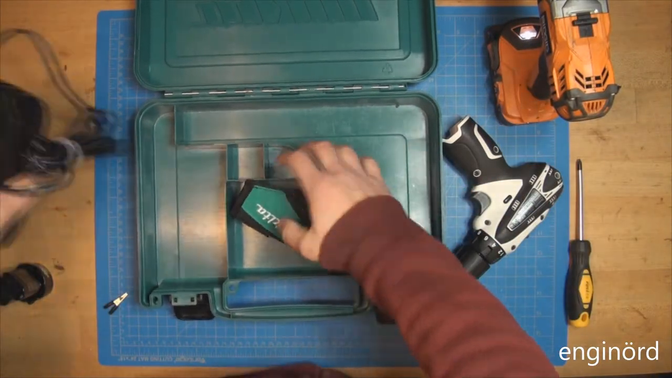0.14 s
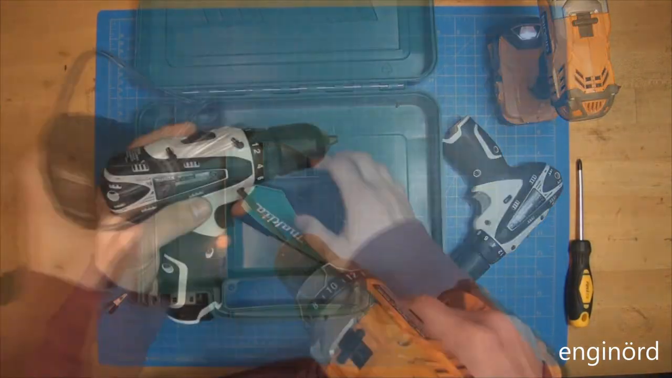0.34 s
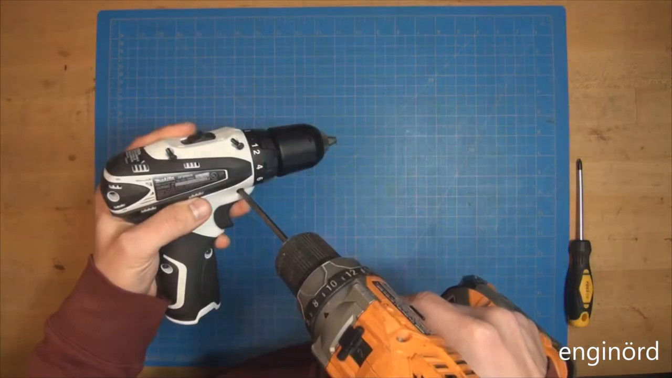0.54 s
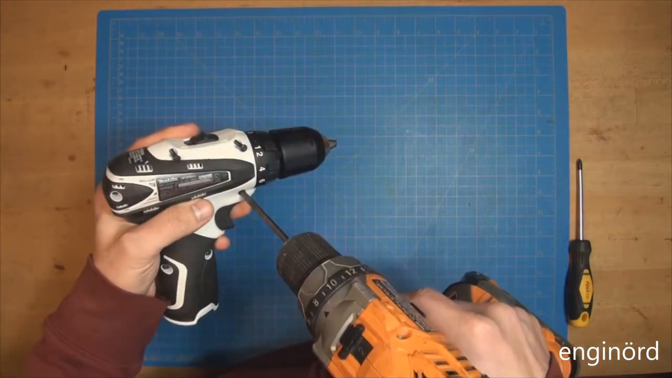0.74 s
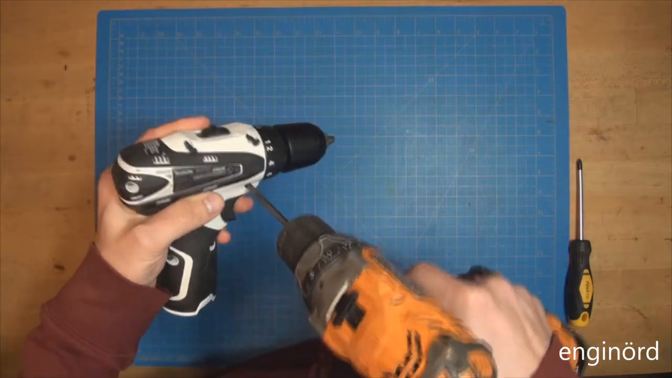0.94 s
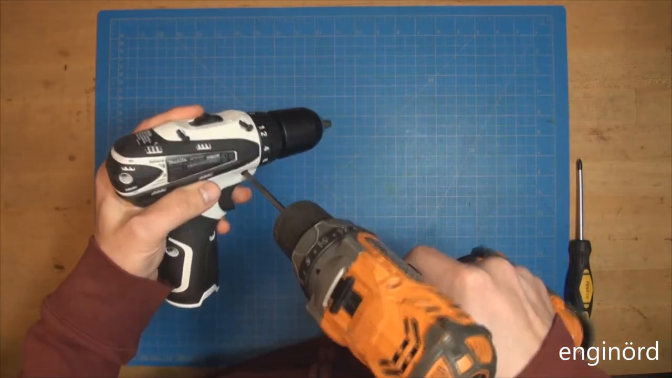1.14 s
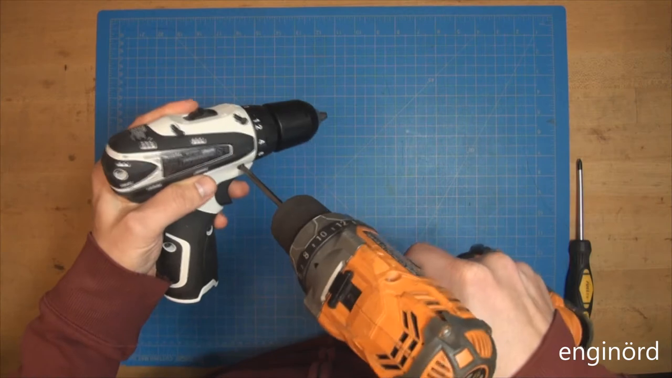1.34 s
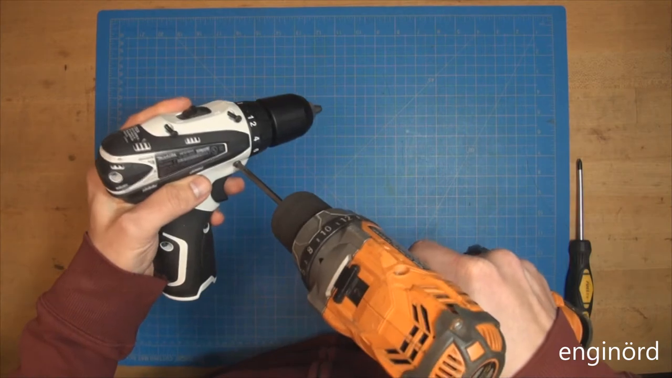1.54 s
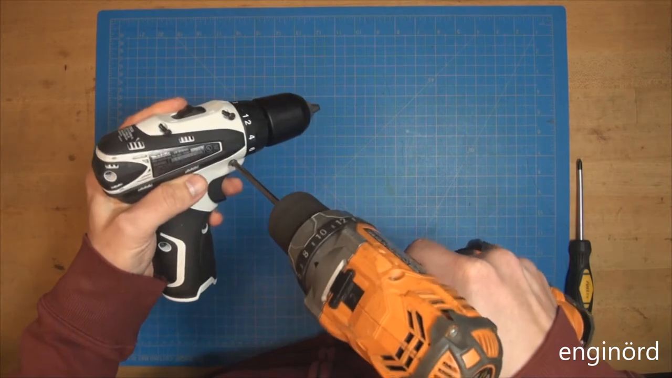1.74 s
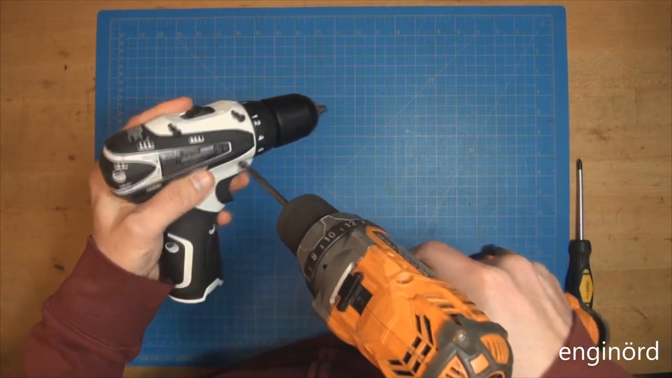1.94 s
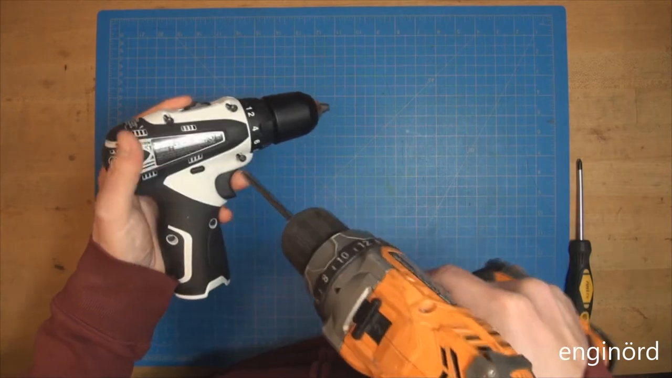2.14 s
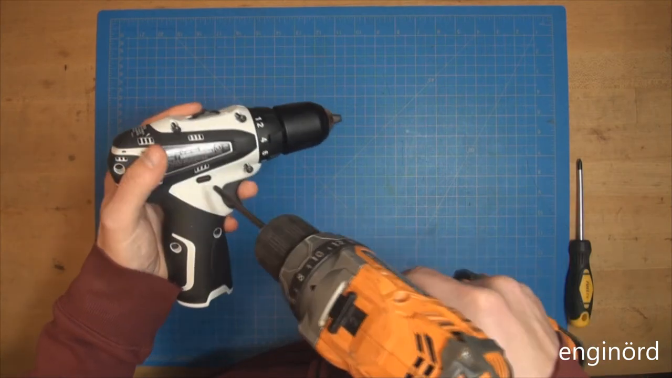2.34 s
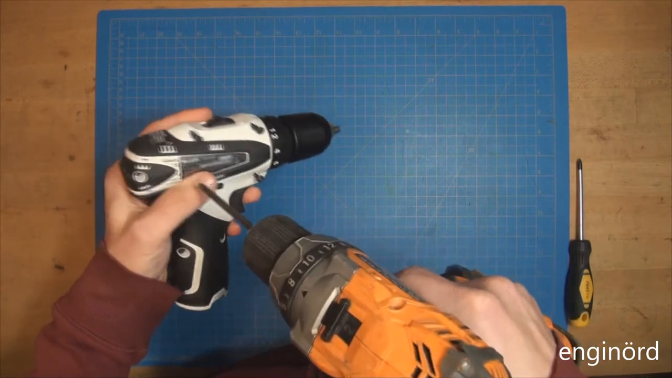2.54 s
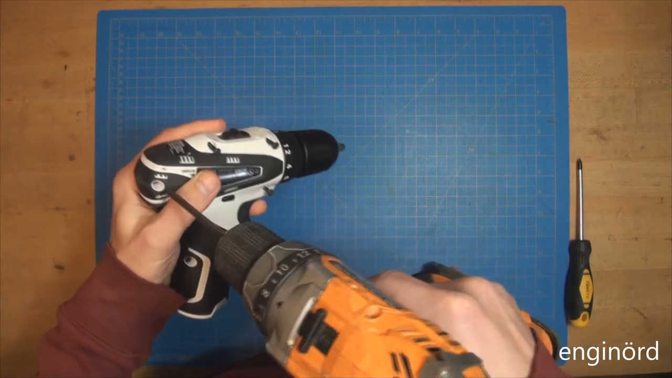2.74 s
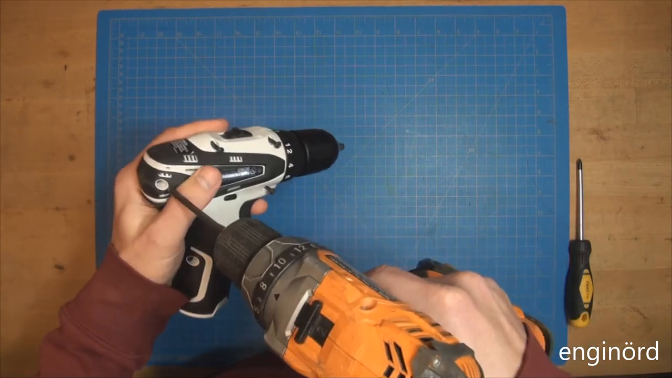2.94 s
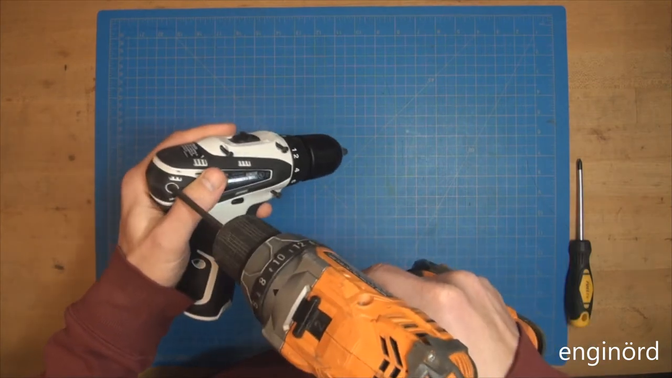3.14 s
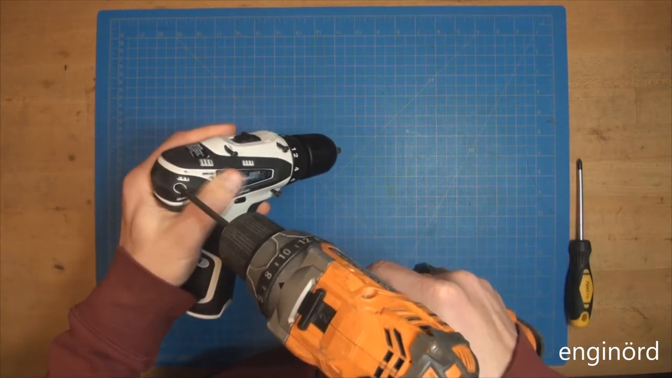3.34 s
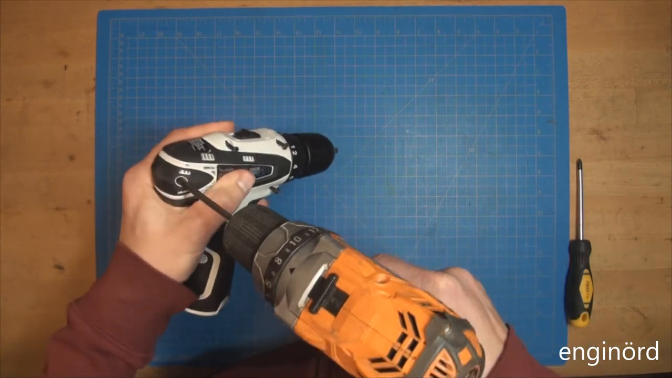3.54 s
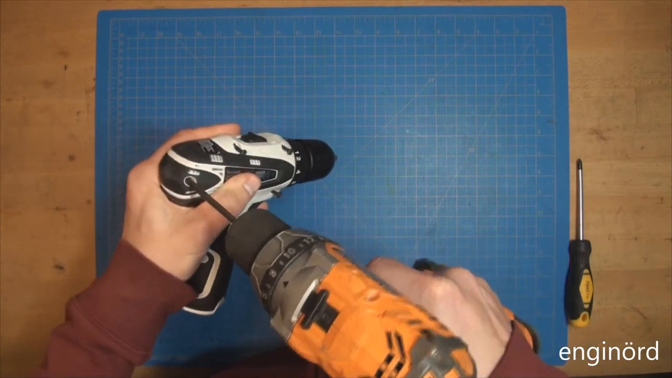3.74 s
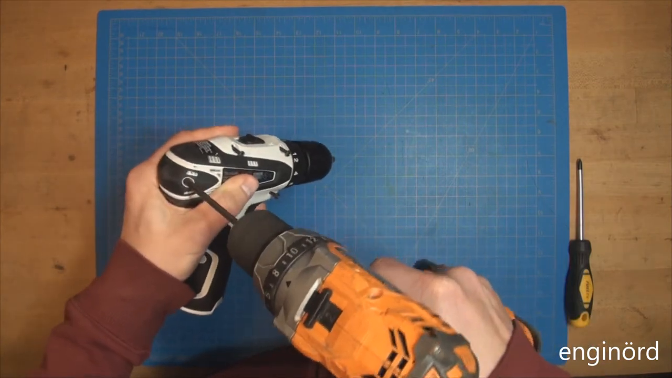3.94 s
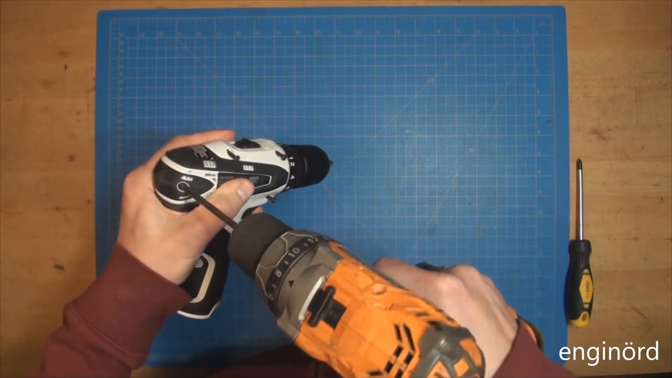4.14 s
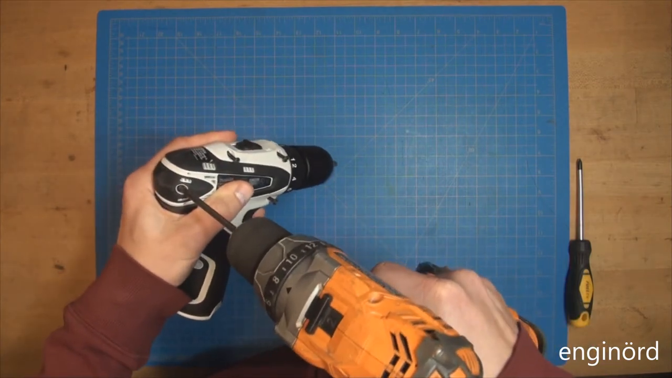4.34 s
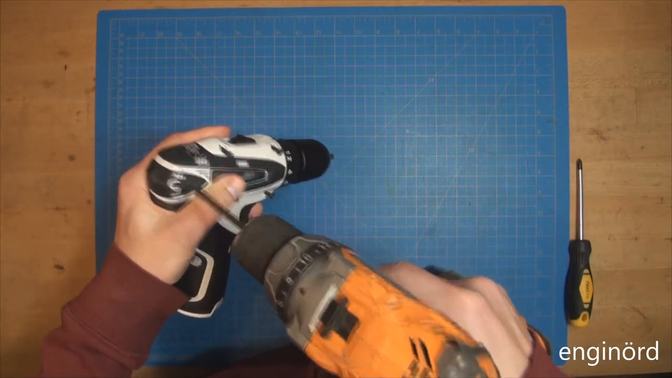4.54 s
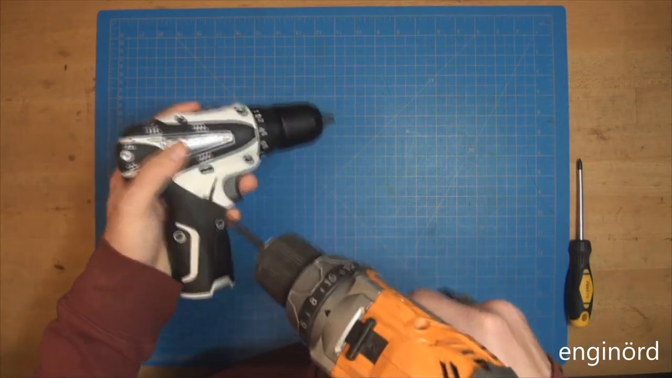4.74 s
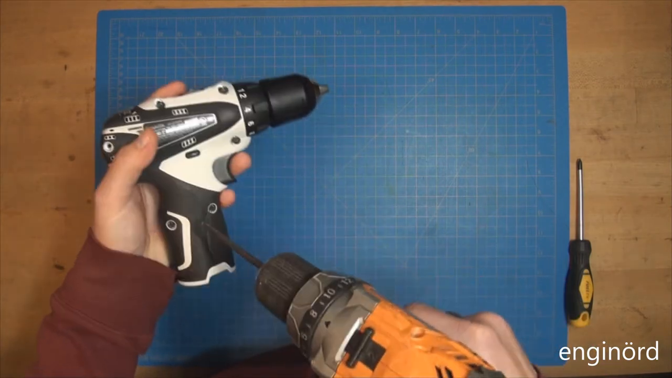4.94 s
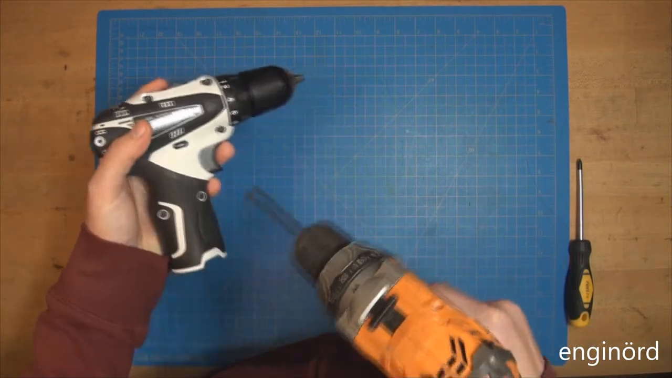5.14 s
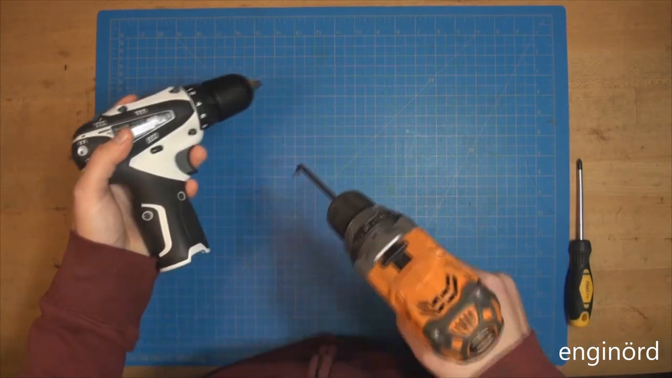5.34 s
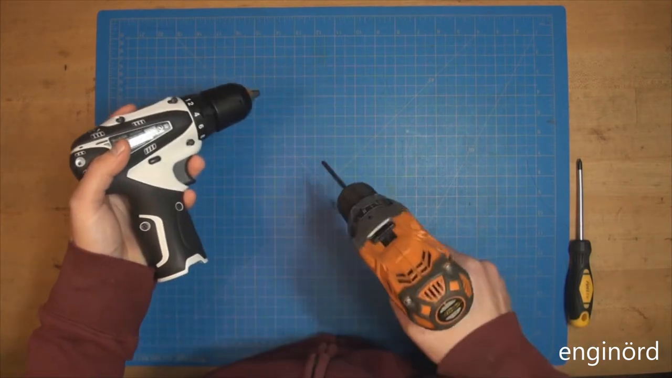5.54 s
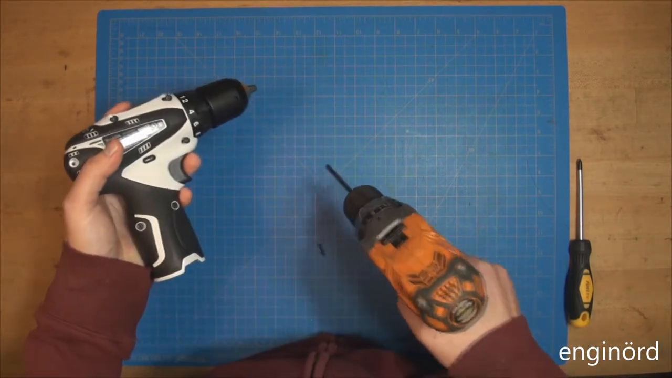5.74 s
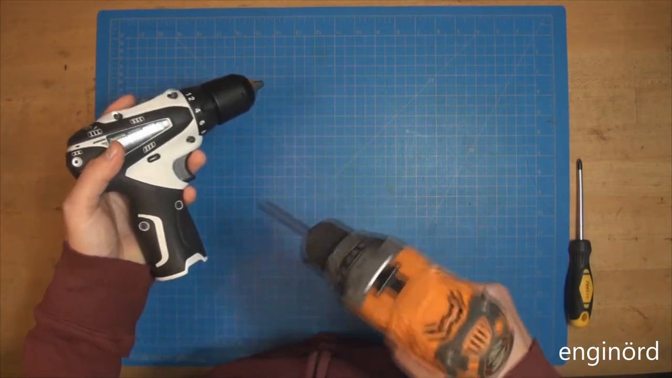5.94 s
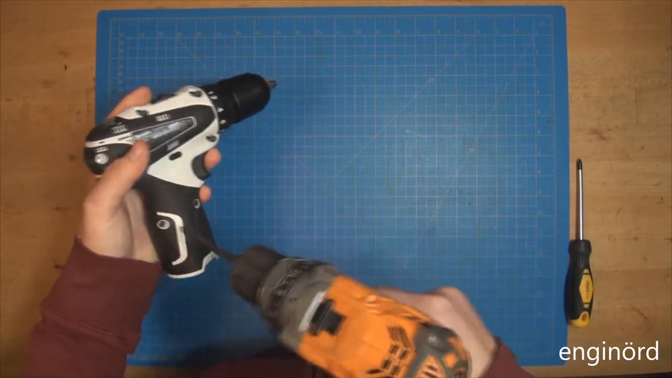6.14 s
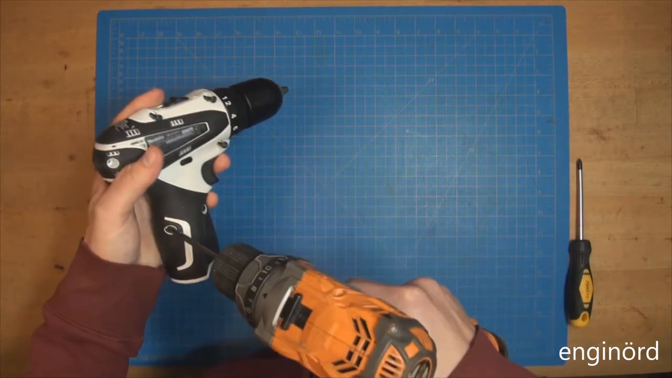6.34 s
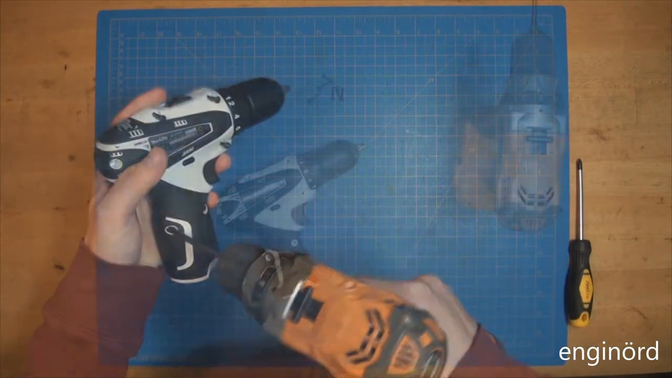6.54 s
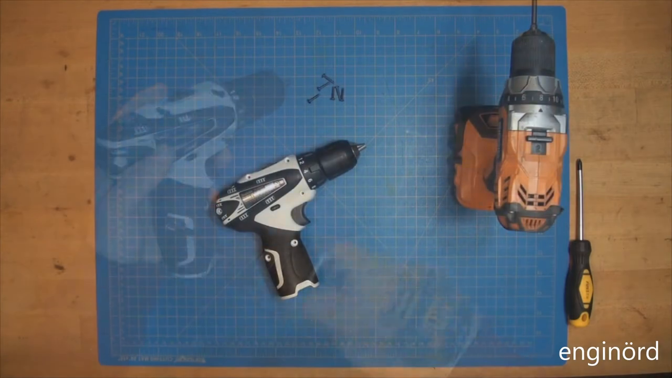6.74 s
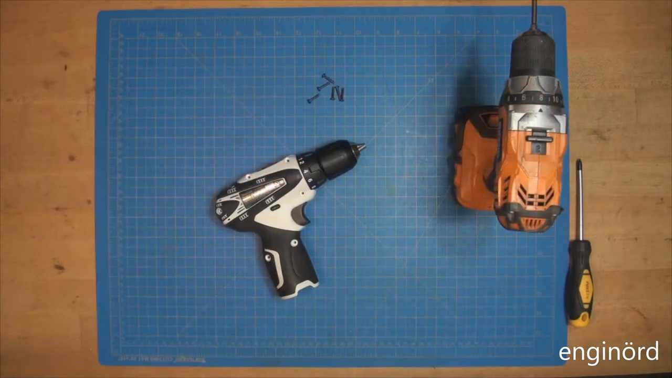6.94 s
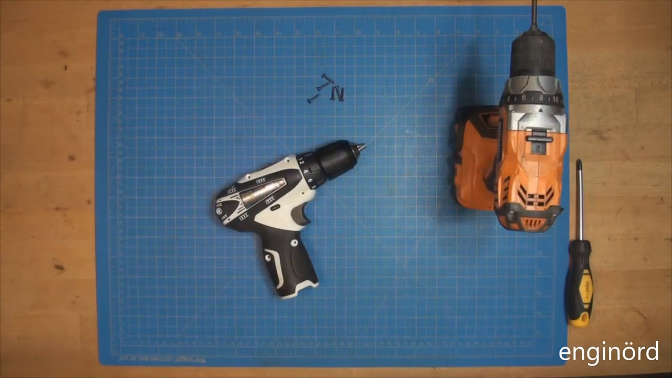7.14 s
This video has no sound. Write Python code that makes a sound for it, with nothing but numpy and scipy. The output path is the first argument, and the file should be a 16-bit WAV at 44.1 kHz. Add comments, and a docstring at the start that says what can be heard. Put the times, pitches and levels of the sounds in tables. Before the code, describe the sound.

Plastic case clatter, bit clicks and two brief cordless drill whirrs with cracking screw threads, then a small screw ticks down and rolls away.

```python
"""Small workshop room, mono but for the hiss: a cordless drill-driver backs two screws out of a plastic housing.
A plastic tool case is knocked shut first (shell modes, cracks, boom). The bit clicks into each screw head;
the thread cracks and rubs (noise grains) while the gearbox whirrs up and coasts down (scrape and mesh tones).
A screw clinks on the bit, drops, bounces and rolls on the mat; cloth and skin rub over the bench (noise)."""
import sys
import numpy as np
from scipy import signal
from scipy.fft import rfft, irfft
from scipy.io import wavfile
from scipy.ndimage import map_coordinates

SR = 44100
rng = np.random.default_rng(int(sys.argv[2]) if len(sys.argv) > 2 else 0)


def to_wav(s):
    """Save 16-bit WAV."""
    ch = np.atleast_2d(s).T  # columns
    pcm = np.round(np.clip(ch, -1, 1) * 32767)  # PCM
    wavfile.write(sys.argv[1], SR, pcm.astype(np.int16))


N = 317901
T = np.arange(N) / SR
AGE = T[:SR // 2]  # s since a blow

# trigger pulls [start/s, screw free/s, trigger eased/s, brake bites/s, gear level/dB, thread rub/dB,
#  whine onset/s, first catch/s, first catch peak/dB, loss per further catch/dB]
TRIGGER_PULLS = [(1.313, 1.95, 2.075, 2.105, -22.5, -35.5, 1.486, 1.476, -8, 0.5),
                 (3.91, 4.42, 4.585, 4.635, -21, -29.5, 3.95, 4.092, -9.5, 8)]
# gearbox shell resonances [f/Hz, width/Hz, gain in pull 1/dB, gain in pull 2/dB]
SHELL_RESONANCES = [(662, 48, 0, 7.5), (3770, 300, -2, -3.5), (4260, 170, -20, -5.5), (5650, 510, -8, 4),
                    (7430, 1200, -3, 2), (12200, 1900, -11, -33)]
# colour of steel thread in plastic [f/Hz, level/dB]
THREAD_SPECTRUM = [(100, -27.5), (650, -1), (1100, -2.5), (2000, 3), (4000, 4.5), (7000, -13.5),
                   (15000, -37)]
FREE_TOOTH_HZ = 1505  # tooth mesh rate, unloaded


def undb(db):
    """Decibels to gain."""
    return 10 ** (np.asarray(db) / 20)


def unit(x):
    """Scale to rms 1."""
    return x / np.sqrt(np.mean(x ** 2))


def walk(rate_hz):
    """Smooth random drift, rms 1, with rate_hz new values a second."""
    return unit(np.interp(T * rate_hz, np.arange(N // 20), rng.standard_normal(N // 20)))


def colour(x, points):
    """Minimum-phase filter through [f/Hz, level/dB] points, via the folded cepstrum."""
    hz, db = np.transpose(points)
    size = 2 ** 12
    bin_hz = np.arange(size // 2 + 1) * SR / size
    gain = undb(np.interp(np.log(bin_hz + 1), np.log(hz), db))
    cepstrum = irfft(np.log(gain))
    cepstrum[1:size // 2] *= 2
    cepstrum[size // 2 + 1:] = 0
    impulse = irfft(np.exp(rfft(cepstrum)))
    return signal.fftconvolve(x, impulse)[:len(x)]


def cut(x, hz, kind, order=2):
    """Butterworth low, high or band-pass."""
    return signal.sosfilt(signal.butter(order, hz, kind, fs=SR, output="sos"), x)


def fade(t60_s):
    """Exponential decay, 60 dB in t60_s."""
    return np.exp(-np.log(1000) * AGE / t60_s)


def ring(modes, scatter_db, detune):
    """Decaying modes; each blow lands elsewhere and weights them anew."""
    out = np.zeros(len(AGE))
    for hz, db, t60_s in modes:
        level, pitch, phase = rng.standard_normal(3)
        tone = np.sin(2 * np.pi * hz * (1 + detune * pitch) * AGE + np.pi * phase)
        out += undb(db + scatter_db * level) * fade(t60_s) * tone
    return out


def contact(scatter, t60_s):
    """Unit click, then dense decaying reflections."""
    return (AGE == 0) + scatter * fade(t60_s) * rng.standard_normal(len(AGE))


def add(out, start_s, sound):
    """Mix a sound in at start_s."""
    i = max(int(start_s * SR), 0)
    out[i:i + len(sound)] += sound[:N - i]


def grains(spread_db):
    """Dense micro-contacts of unequal size, up to a largest one."""
    size = np.minimum(rng.exponential(size=N), 4.5)
    return unit(rng.standard_normal(N) * undb(spread_db * size))


def resonance(hz, centre_hz, width_hz):
    """Gain of a tone as it glides through a resonance."""
    return 1 / (1 + (2 * (hz - centre_hz) / width_hz) ** 2)


def swell(start_s, length_s, attack_s, t60_s):
    """Envelope of a rub: linear rise from start_s, decay from start_s + length_s."""
    rise = np.clip((T - start_s) / attack_s, 0, 1)
    return rise * undb(-60 * np.clip((T - start_s - length_s) / t60_s, 0, 10))


def swells(rows, attack_s, t60_s):
    """Joint envelope of several rubs; their powers add."""
    return np.sqrt(sum((undb(db) * swell(s, length_s, attack_s, t60_s)) ** 2 for s, length_s, db in rows))


def tightness(pull):
    """Grip of the thread: 1 at the start of a pull, 0 once the screw runs free."""
    start_s, free_s = pull[:2]
    return (T > start_s) * np.clip((free_s - T) / (free_s - start_s), 0, 1)


def tooth_rate(pull, spin_up_lag=.45, spin_up_s=.028, load_sag=.07, coast_hz_per_s=1750):
    """Tooth rate in Hz: spins up, gains as the screw loosens, slows once the trigger is eased; floor at half."""
    start_s, _, eased_s = pull[:3]
    # lag and sag are shares of the free speed
    spin_up = 1 - spin_up_lag * np.exp(-np.maximum(T - start_s, 0) / spin_up_s)
    load = 1 - load_sag * (1 - (1 - tightness(pull)) ** 2)
    hz = FREE_TOOTH_HZ * spin_up * load - coast_hz_per_s * np.maximum(T - eased_s, 0)
    return np.maximum(hz, FREE_TOOTH_HZ / 2)


def gear_gain(pull, tooth_hz, speed_db=16, brake_db_per_s2=950):
    """Gears are louder the faster they turn and die away ever faster under the brake."""
    start_s, _, _, brake_s, db = pull[:5]
    brake_loss_db = brake_db_per_s2 * np.clip(T - brake_s, 0, .5) ** 2
    return (T > start_s) * undb(db + speed_db * (tooth_hz / FREE_TOOTH_HZ - 1) - brake_loss_db)


def shell_gain(tone_hz, j):
    """Lift that the gearbox shell gives a gliding tone in pull j."""
    return 1 + sum(undb(gains_db[j]) * resonance(tone_hz, hz, width_hz)
                   for hz, width_hz, *gains_db in SHELL_RESONANCES)


def gear_noise(tooth_hz, phase, j, ripple=.35, wear_db=-8, wear_samples=293, split_hz=4300, coast_db=24):
    """Teeth scrape once a mesh cycle and ring the shell; slow teeth strike softly, so low growl gains."""
    # gear scrape colour [f/Hz, level/dB]
    gear_colour = [(50, -39), (260, -28), (400, -17.5), (1000, -15), (1500, -8), (2700, -10.5),
                   (5600, -4.5), (9000, -9), (12000, -4.5), (15800, -16)]
    # worn teeth come round again: a pattern of ten teeth is read at the gear speed
    position = np.cumsum(tooth_hz) / FREE_TOOTH_HZ % wear_samples
    wear = map_coordinates(rng.standard_normal(wear_samples), [position], mode="grid-wrap")
    scrape = (grains(1.6) + undb(wear_db) * wear) * (1 + ripple * np.cos(phase)) * undb(.21 * walk(180))
    scrape = colour(signal.fftconvolve(scrape, contact(.047, .0066))[:N], gear_colour)
    shell = scrape.copy()
    for hz, width_hz, *gains_db in SHELL_RESONANCES:
        shell += undb(gains_db[j]) * signal.lfilter(*signal.iirpeak(hz, hz / width_hz, SR), scrape)
    growl = signal.sosfiltfilt(signal.butter(3, split_hz, fs=SR, output="sos"), shell)
    rasp = shell - growl
    growl_gain = undb(coast_db * (1 - tooth_hz / FREE_TOOTH_HZ))
    return (rasp + growl_gain * growl) / np.std(rasp)


def gear_tones(pull, tooth_hz, phase, j, whine_hz=1490, whine_width_hz=450, rise_s=.013, slack_db_per_s2=2600):
    """Meshing sings at multiples of the tooth rate; the whine fades once the teeth no longer drive."""
    # gear and motor tones [multiple of tooth rate, level/dB, wavering 0-1]
    tone_rows = [(.3, -28, .3), (1, -10.2, .15), (3, -18, .17), (4, -22, .4), (5, -23, .35), (8, -23, .4),
                 (9, -23, .4)]
    eased_s, whine_s = pull[2], pull[6]
    slack_loss_db = slack_db_per_s2 * np.clip(T - eased_s, 0, .5) ** 2
    driving = np.clip((T - whine_s) / rise_s, 0, 1) * undb(-slack_loss_db)
    tones = np.zeros(N)
    for k, db, waver in tone_rows:
        if k == 1:
            lift = driving * resonance(tooth_hz, whine_hz, whine_width_hz)
        else:
            lift = shell_gain(k * tooth_hz, j)
        tone = np.cos(k * phase + waver * walk(90)) * (1 + waver * walk(60))
        tones += undb(db) * lift * unit(tone)
    return tones


def gearbox():
    """Scrape noise and mesh tones share one tooth phase, rising and falling with the speed."""
    out = np.zeros(N)
    for j, pull in enumerate(TRIGGER_PULLS):
        # backlash makes the speed tremble
        tooth_hz = tooth_rate(pull) * (1 + .0024 * walk(170))
        phase = 2 * np.pi * np.cumsum(tooth_hz) / SR
        sound = gear_noise(tooth_hz, phase, j) + gear_tones(pull, tooth_hz, phase, j)
        out += gear_gain(pull, tooth_hz) * sound
    return out


def thread(slip_db=1.0):
    """Screw thread sticks and slips in uneven spurts: hard as it gives way, then less as it loosens."""
    # rasps of the yielding thread [start/s, length/s, level/dB]
    breakaway_rows = [(1.32, 0.064, -24.5), (3.903, 0.016, -22)]
    slips = signal.fftconvolve(grains(3.7) * undb(slip_db * walk(140)), contact(.16, .014))[:N]
    rub = sum(undb(pull[5]) * tightness(pull) for pull in TRIGGER_PULLS)
    breakaway = swells(breakaway_rows, attack_s=.0049, t60_s=.028)
    return np.hypot(rub, breakaway) * unit(colour(slips, THREAD_SPECTRUM))


def catches(pull, count=3, teeth_per_turn=107):
    """Tight screw catches once a turn, each time weaker: rows of (t/s, peak/dB)."""
    first_s, db, loss_db = pull[-3:]
    turns = np.cumsum(tooth_rate(pull)) / SR / teeth_per_turn
    times_s = np.interp(np.interp(first_s, T, turns) + np.arange(count), turns, T)
    return [(s, db - k * loss_db) for k, s in enumerate(times_s)]


def cracks():
    """Short, dry snaps of steel thread in plastic."""
    # cracks as the thread gives [t/s, peak/dB]
    crack_rows = [(1.297, -13), (1.419, -10), (3.911, -10), (3.925, -5)]
    out = np.zeros(N)
    for s, db in list(crack_rows) + [row for pull in TRIGGER_PULLS for row in catches(pull)]:
        snap = colour(contact(.22, .024), THREAD_SPECTRUM)
        add(out, s, undb(db) * snap / np.abs(snap).max())
    return out


def seating():
    """Steel bit seats in the screw head: bright click and short ring of the head."""
    # seating clicks [t/s, peak/dB, ring/dB re click]
    seating_rows = [(1.227, -22, -2), (1.2497, -13.5, 0), (1.2791, -16.5, -7), (1.3015, -10.5, -5),
                    (1.316, -11.5, -14), (3.7874, -19.5, -6.5), (3.814, -26, -8), (3.8414, -12.5, -0.5),
                    (3.861, -27, -4), (3.886, -16, -16)]
    # screw head modes under the bit [f/Hz, level/dB, t60/s]
    head_modes = [(1625, -2, 0.018), (1870, -2.5, 0.018)]
    # click colour [f/Hz, level/dB]
    click_colour = [(200, -4), (700, -1), (12000, -1), (15800, -10)]
    out = np.zeros(N)
    for s, db, ring_db in seating_rows:
        click = unit(colour(contact(.13, .052), click_colour))
        click = click + undb(ring_db) * unit(ring(head_modes, 1.5, .023))
        add(out, s, undb(db) * click / np.abs(click).max())
    return out


def chuck(width_hz=420, attack_s=.004, t60_s=.28):
    """Chuck rattles in its play while the drive slows: band-passed grains."""
    # rattles [start/s, length/s, level/dB, f/Hz]
    rattle_rows = [(2.157, .015, -31, 3150)]
    out = np.zeros(N)
    for s, length_s, db, hz in rattle_rows:
        rattle = cut(grains(4.5), [hz - width_hz / 2, hz + width_hz / 2], "band", order=1)
        out += undb(db) * swell(s, length_s, attack_s, t60_s) * unit(rattle)
    return out


def shudder(attack_s=.017, t60_s=.12):
    """Braking drive sets the drill body humming at each stop: a sine with wandering phase."""
    # hums [start/s, length/s, level/dB, f/Hz]
    hum_rows = [(2.176, 0.038, -38, 674), (4.648, 0.021, -36, 645)]
    out = np.zeros(N)
    for s, length_s, db, hz in hum_rows:
        hum = np.sin(2 * np.pi * hz * T + .63 * walk(90))
        out += undb(db) * swell(s, length_s, attack_s, t60_s) * unit(hum)
    return out


def knocks(rows, modes, body, crack_db, crack_t60_s, mid_db, lag_s):
    """Blows on a plastic shell: crack plus modes, in a balance set by how hard the contact is."""
    out = np.zeros(N)
    for s, db, bass_db, treble_db in rows:
        crack = colour(contact(.12, crack_t60_s), body)
        blow = undb(crack_db) * unit(crack) + unit(ring(modes, 3.2, .048))
        blow = blow * (1 - np.exp(-AGE / .00029))
        # softer contact loses its top sooner
        blow = cut(blow, min(17000 * undb(treble_db / 2), SR / 2.5), "low")
        bass = cut(blow, [210, 900], "band")
        mid = cut(blow, [900, 3000], "band", order=3)
        treble = cut(blow, 2900, "high", order=4)
        for band, band_db in ((bass, bass_db), (mid, mid_db), (treble, treble_db)):
            onset_rms = np.std(band[:SR // 100])
            add(out, s + lag_s, undb(db + band_db) * band / onset_rms)
    return out


def housing():
    """Bit feels for the screw heads, fingers shift on the plastic, and the loosening screw knocks it once a
    turn late in the first pull: knocks on its modes."""
    # taps [t/s, level/dB, bass/dB re level, treble/dB re level]
    tap_rows = [(0.71, -23.5, -13, -12), (0.912, -29, -3.5, -19), (0.919, -21.5, -26, -20.5),
                (0.973, -26, -17, -16.5), (0.994, -30, -15, -13.5), (1.034, -22, -11.5, -22.5),
                (1.912, -27.5, -7, -20), (2.058, -26, -10, -20), (2.675, -42.5, -5.5, -32),
                (3.032, -24, -19, -50), (3.184, -18, -19, -47.5), (3.258, -26, -21, -44),
                (3.357, -4.5, -21.5, -18), (3.38, -16, -17.5, -44), (3.622, -25, -15, -13.5),
                (6.52, -13, -18, -25.5), (6.529, -12.5, -23, -20), (6.5455, -7, -19.5, -20.5),
                (6.643, -15.5, -19.5, -25)]
    # housing modes [f/Hz, level/dB, t60/s]
    housing_modes = [(416, 3, 0.026), (669.6, 0, 0.097), (1354, 7.5, 0.014), (1595, -7, 0.033),
                     (2390, -8.5, 0.016)]
    body = [(100, -6), (350, 3), (700, 7), (1600, 3), (3000, -13), (6500, -12.5), (9000, -20.5), (15000, -10)]
    return knocks(tap_rows, housing_modes, body, crack_db=-2.5, crack_t60_s=.043, mid_db=-14.5, lag_s=.002)


def case(boom_s=.365, boom_db=-23, boom_t60_s=.5):
    """Case is knocked about; its hollow shell booms on after the hardest blow."""
    # case knocks [t/s, level/dB, bass/dB re level, treble/dB re level]
    knock_rows = [(0.002, -17, -7.5, -28), (0.105, -12, -10, -21.5), (0.206, -15, -10, -19),
                  (0.22, -9.5, -11.5, -16.5), (0.239, -19, -3.5, -14), (0.267, -33, -21.5, -5.5),
                  (0.3565, -2, -12.5, -29), (0.402, -21, -10, -27.5), (0.58, -24.5, -5.5, -58)]
    # case modes [f/Hz, level/dB, t60/s]
    case_modes = [(372, -17, 0.191), (460, 3, 0.038), (626, 0, 0.095), (708, -2.5, 0.1), (905, 3.5, 0.045),
                  (1183, 5.5, 0.068), (1422, 1, 0.0213), (1494, 14.5, 0.02), (2330, -19.5, 0.042),
                  (2900, -6, 0.033)]
    body = [(200, -9.5), (380, 2.5), (700, 11), (1600, 3), (3000, -7.5), (6000, -14.5), (15000, -12)]
    hollow = [(80, -38), (250, -9.5), (400, -2), (750, 0), (1500, -11), (3000, -25), (6000, -49.5)]
    out = knocks(knock_rows, case_modes, body, crack_db=-1.5, crack_t60_s=.054, mid_db=-7.5, lag_s=.0031)
    boom = colour(grains(5)[:len(AGE)], hollow)
    add(out, boom_s, undb(boom_db) * unit(boom) * fade(boom_t60_s))
    return out


def lid(rub_s=.195, length_s=.016, rub_db=-26, t60_s=.086):
    """Lid scrapes over its rim just before it snaps shut: band-passed grains."""
    scrape = unit(cut(grains(2.8), [700, 4500], "band"))
    return undb(rub_db) * swell(rub_s, length_s, length_s, t60_s) * scrape


def screw_clinks(trim_db=4, lag_s=.00107):
    """Loose screw clinks on the bit tip: steel modes plus a bright contact."""
    # clinks [t/s, peak/dB before trim and dulling-independent]
    clink_rows = [(5.2625, -37.5), (5.389, -46), (5.524, -40.5), (5.6238, -20.5)]
    # steel bit modes [f/Hz, level/dB, t60/s]
    bit_modes = [(684, -15.5, 0.14), (3980, -2.5, 0.028), (10150, 2, 0.037), (10420, 3.5, 0.068)]
    out = np.zeros(N)
    for s, db in clink_rows:
        clink = ring(bit_modes, .31, .0031) + 2 * cut(contact(.27, .053), 2900, "high")
        # lighter touch is duller
        clink = cut(clink, min(50000 * undb(db / 2), SR / 2.5), "low")
        add(out, s + lag_s, undb(db + trim_db) * clink / np.abs(clink).max())
    return out


def screw_bounces(lag_s=.00107):
    """Fallen screw bounces ever more weakly on the mat: coloured contacts."""
    # bounces [t/s, peak/dB]
    bounce_rows = [(5.6856, -3.5), (5.7548, -16), (5.788, -19.5), (5.809, -25.5), (5.8574, -31)]
    # bounce colour [f/Hz, level/dB]
    bounce_colour = [(200, -34), (650, -15), (1100, -5), (1800, 1.5), (3000, 3.5), (4500, -3.5), (9000, -8),
                     (15000, -16.5)]
    out = np.zeros(N)
    for s, db in bounce_rows:
        tick = colour(contact(.087, .058), bounce_colour)
        add(out, s + lag_s, undb(db) * tick / np.abs(tick).max())
    return out


def screw_roll(start_s=5.72, length_s=.54, roll_db=-48, slowing_db_per_s=6.5):
    """Screw rolls away: unsteady coloured grains that weaken as it slows."""
    # rolling colour [f/Hz, level/dB]
    roll_colour = [(600, -38), (1650, -1), (2100, 2.5), (2800, -2.5), (7000, -28), (15000, -57)]
    level = undb(roll_db - slowing_db_per_s * (T - start_s))
    rolling = swell(start_s, length_s, attack_s=.066, t60_s=1) * level
    return rolling * undb(1.6 * walk(45)) * unit(colour(grains(7.7), roll_colour))


def thud(thud_s=6.876, length_s=.03, thud_db=-31, attack_s=.0018, t60_s=.09, low_hz=380, high_hz=660):
    """Something heavy settles softly on the mat: a band-passed noise burst."""
    noise = unit(cut(rng.standard_normal(N), [low_hz, high_hz], "band"))
    return undb(thud_db) * swell(thud_s, length_s, attack_s, t60_s) * noise


def sleeves(still_db=-60):
    """Sleeves rustle with arm movements over the faint rub of hands that only hold on."""
    # arm movements [start/s, length/s, level/dB]
    move_rows = [(-.05, 0.062, -34), (.96, 0.11, -45), (3.15, 0.81, -48), (3.55, 0.04, -41),
                 (4.7, 1.3, -57), (5.9, 0.62, -49.5), (6.6, 0.33, -43.5), (6.87, .4, -38)]
    # rustle colour [f/Hz, level/dB]
    rustle_colour = [(30, -25), (230, -3), (410, 1), (540, -4), (700, -4), (1900, -12.5), (3300, -12.5),
                     (6000, -22.5), (15000, -31)]
    folds = undb(1.2 * walk(35))
    level = np.hypot(undb(still_db), swells(move_rows, attack_s=.016, t60_s=1))
    return level * folds * unit(colour(grains(4.1), rustle_colour))


def hand_sweep():
    """Hand sweeps over the mat and trails off: coloured grains of uneven level."""
    # strokes [start/s, length/s, level/dB]
    stroke_rows = [(6.885, 0.1, -29.5), (7.0, 0.16, -43.5)]
    # sweep colour [f/Hz, level/dB]
    sweep_colour = [(200, -32), (700, -3), (2700, 0), (10400, -8), (15800, -19)]
    level = swells(stroke_rows, attack_s=.042, t60_s=.2) * undb(.93 * walk(53))
    return level * unit(colour(grains(2.3), sweep_colour))


def room(x, wet_db=-16, t60_s=.32, dull_hz=4000):
    """Small workshop: short, dull tail of decaying low-passed noise."""
    tail = cut(rng.standard_normal(len(AGE)), dull_hz, "low", order=1)
    tail = tail * fade(t60_s) * np.minimum(AGE / .0011, 1)
    return x + undb(wet_db) * signal.fftconvolve(x, tail / np.linalg.norm(tail))[:N]


def hiss(hiss_db=-54.5, side_db=-8.5):
    """Microphone hiss: a common part plus a weaker part of opposite sign in the two channels."""
    # hiss colour [f/Hz, level/dB]
    hiss_colour = [(25, -15), (100, -2.5), (250, -11.5), (2000, -11.5), (5200, -10), (15800, -10)]
    mid, side = (undb(hiss_db) * unit(colour(rng.standard_normal(N), hiss_colour)) for _ in range(2))
    return mid + undb(side_db) * cut(side, 120, "high", order=1) * np.array([[1], [-1]])


def scene():
    """Tool sounds pass through the room; cloth and skin rubs stay dry; hiss makes two channels."""
    drill = gearbox() + thread() + cracks() + seating() + chuck() + shudder()
    plastic = housing() + case() + lid()
    loose_screw = screw_clinks() + screw_bounces() + screw_roll()
    mono = room(drill + plastic + loose_screw + thud()) + sleeves() + hand_sweep()
    return mono + hiss()


def record(dry, top_hz=15900):
    """Steep elliptic low-pass cuts the top."""
    return signal.sosfilt(signal.ellip(10, .2, 80, top_hz, fs=SR, output="sos"), dry)


dry = scene()
out = record(dry)
to_wav(out)
```